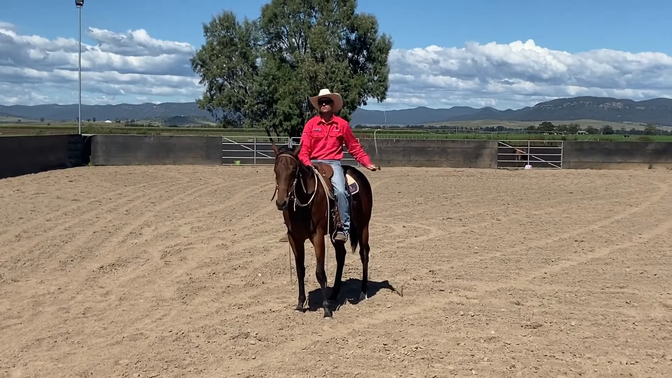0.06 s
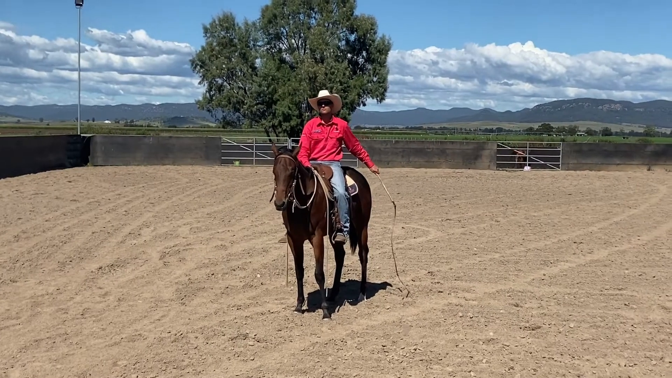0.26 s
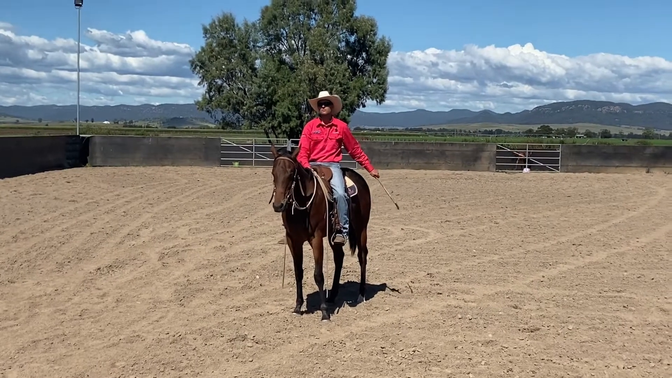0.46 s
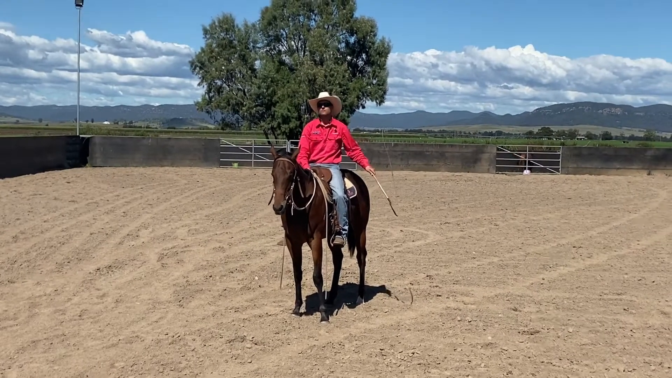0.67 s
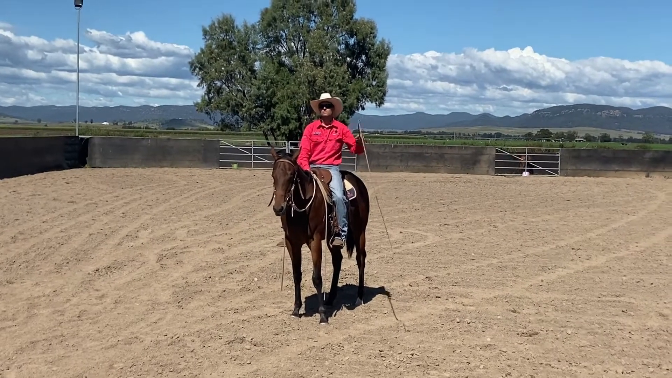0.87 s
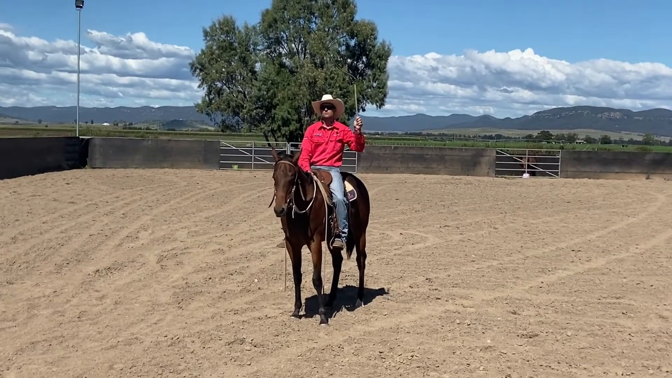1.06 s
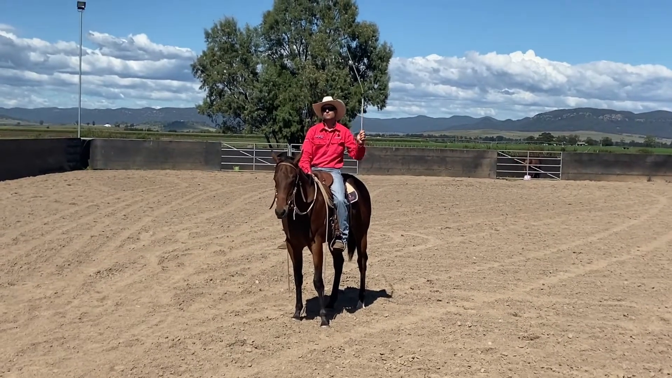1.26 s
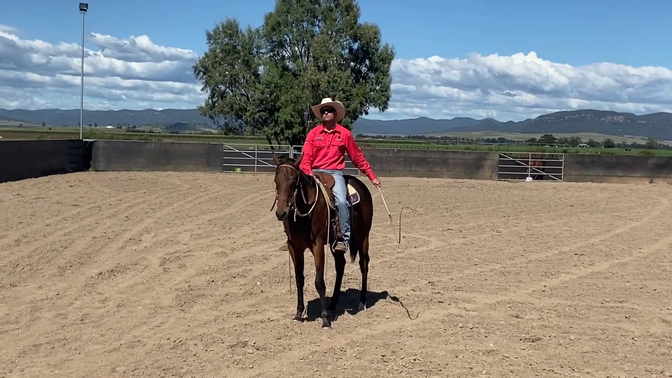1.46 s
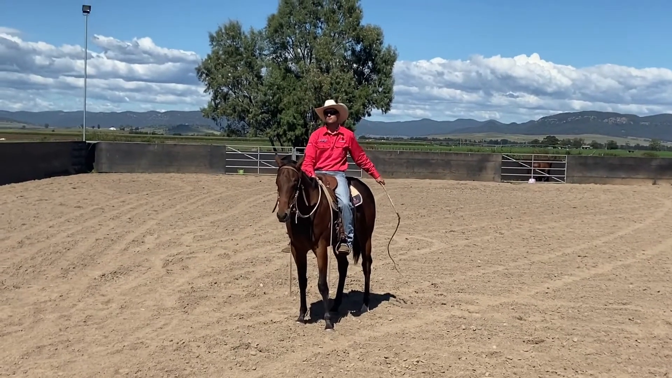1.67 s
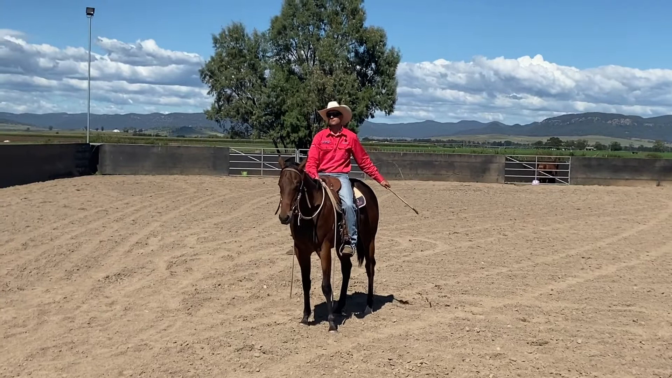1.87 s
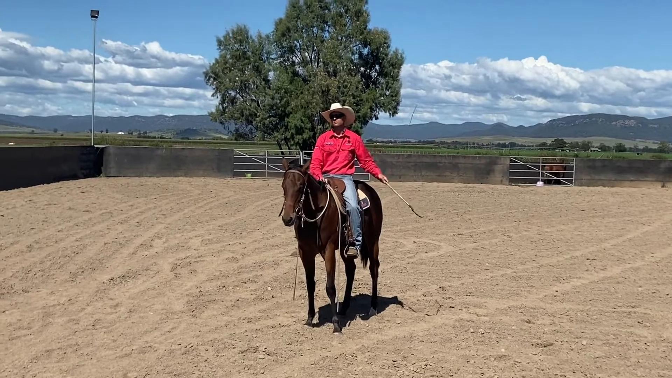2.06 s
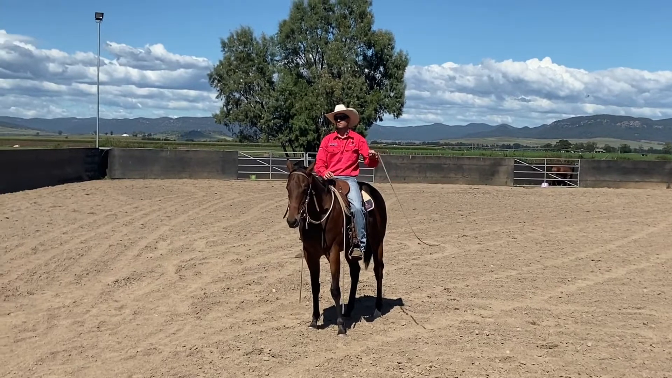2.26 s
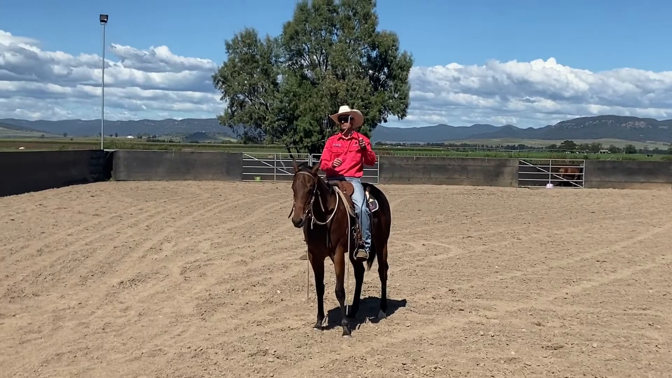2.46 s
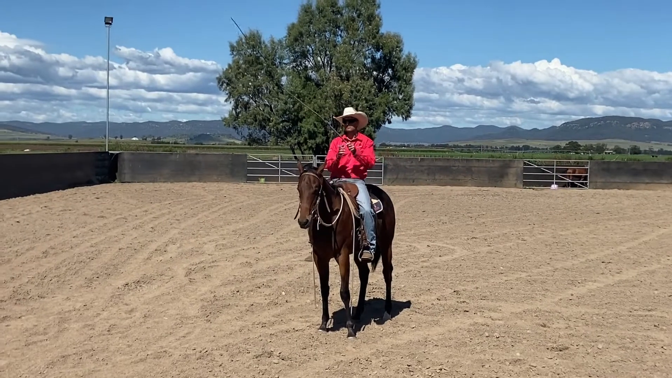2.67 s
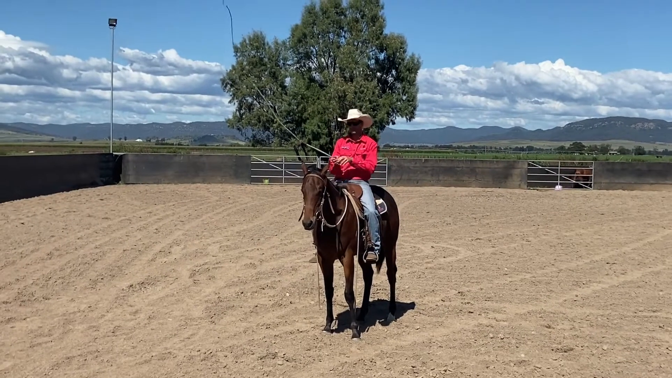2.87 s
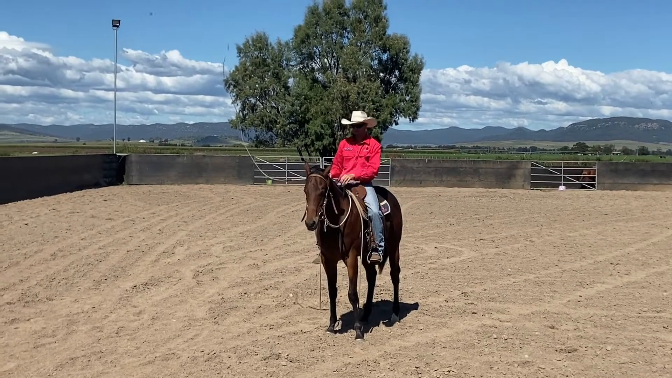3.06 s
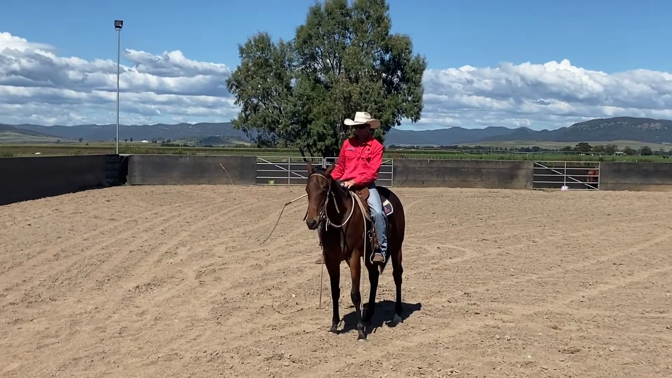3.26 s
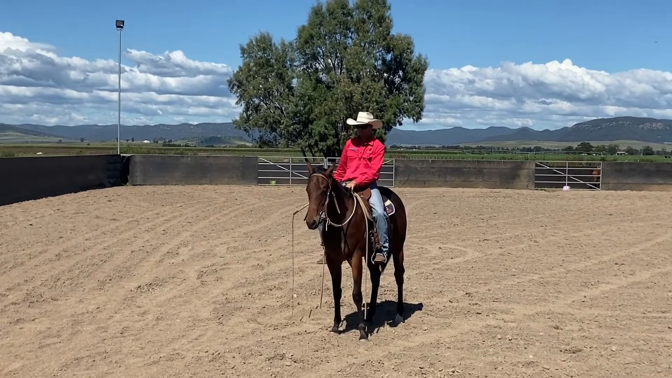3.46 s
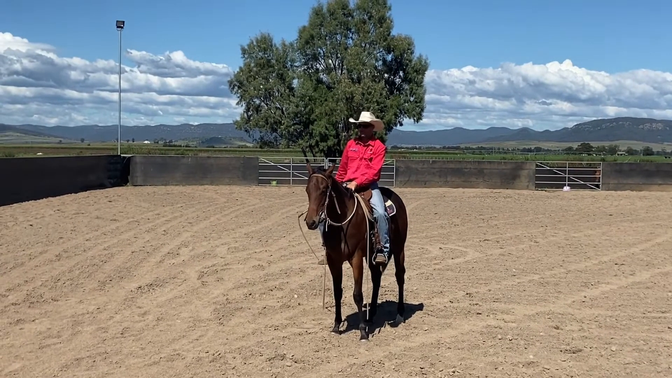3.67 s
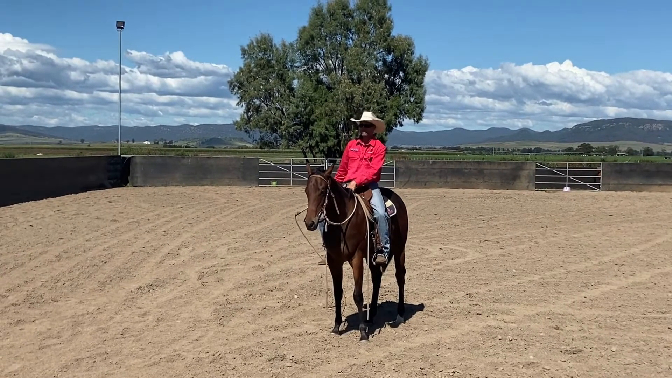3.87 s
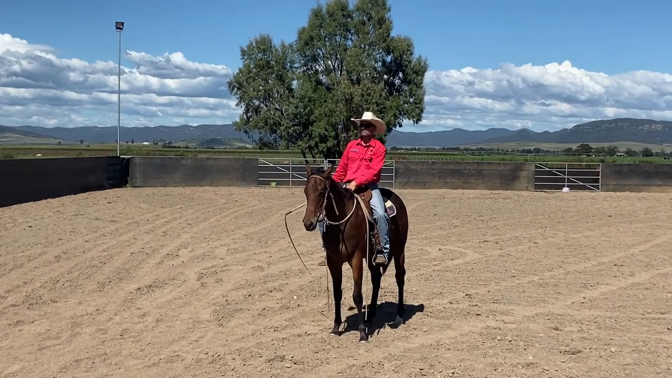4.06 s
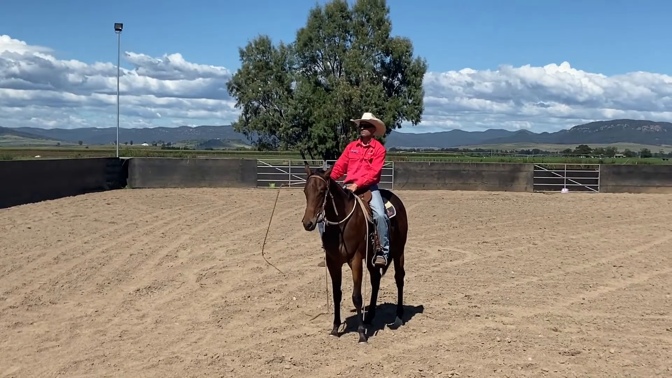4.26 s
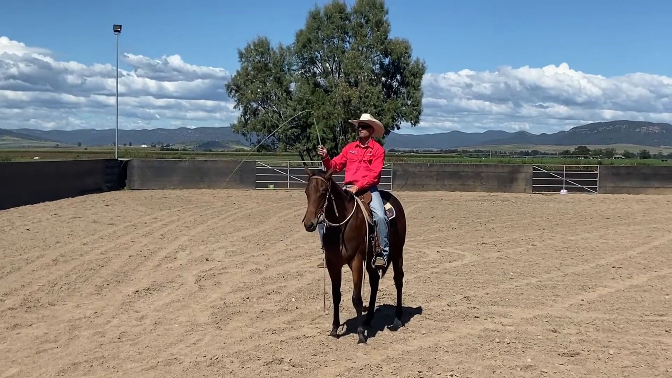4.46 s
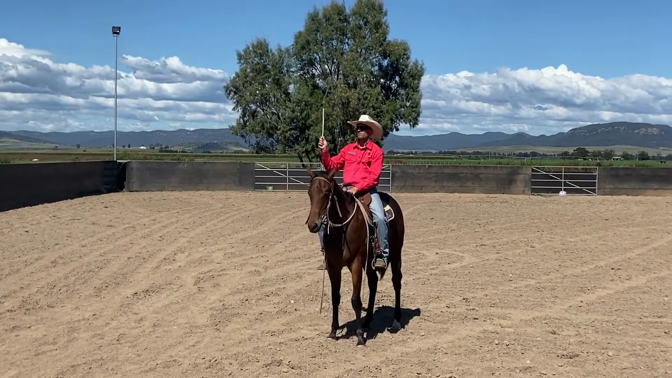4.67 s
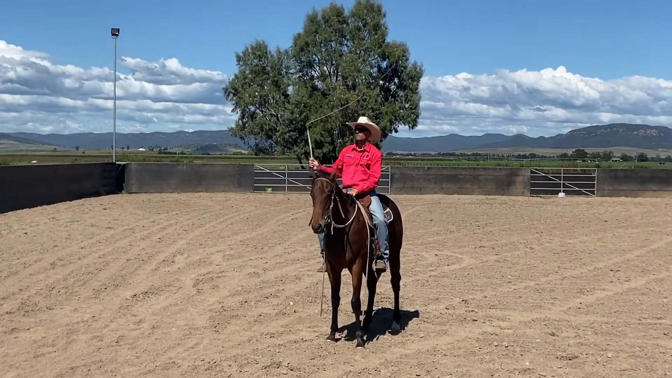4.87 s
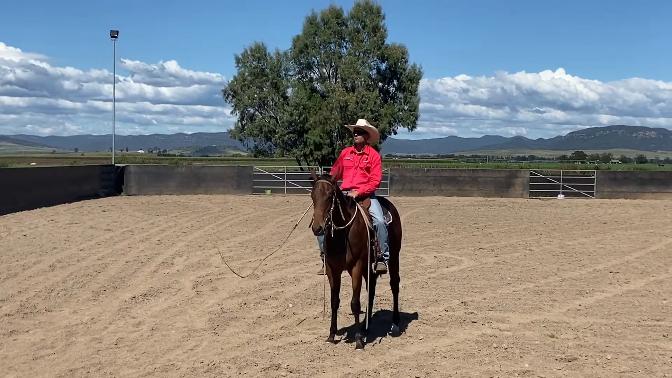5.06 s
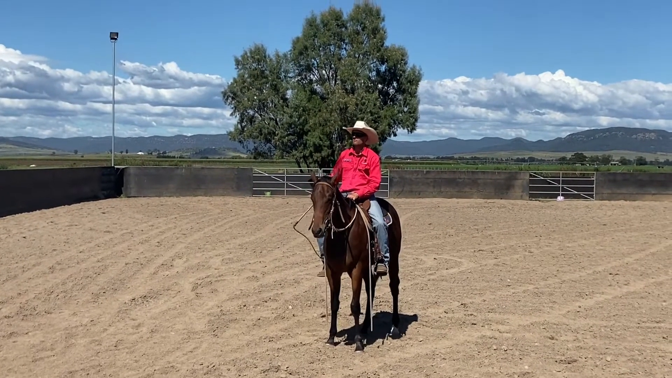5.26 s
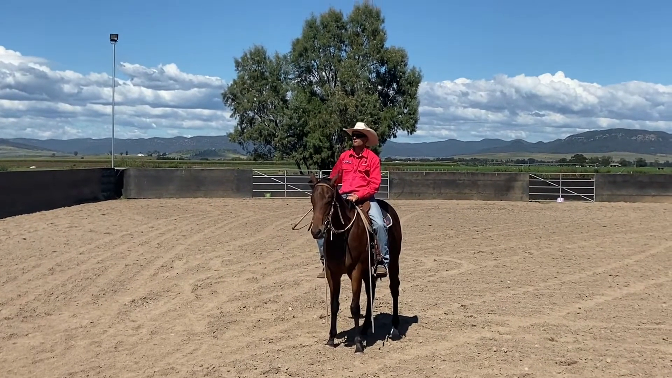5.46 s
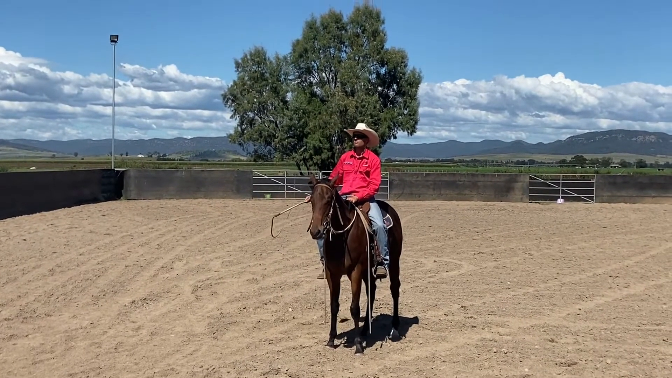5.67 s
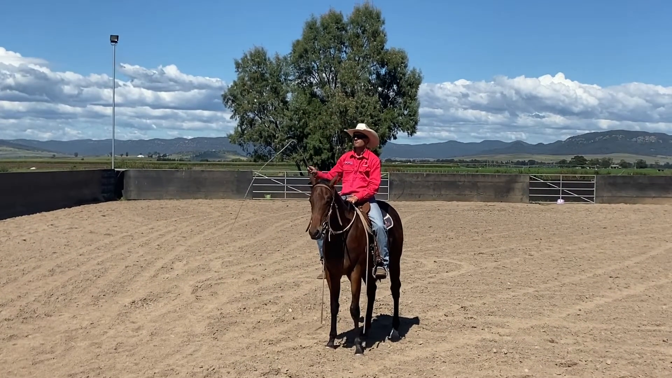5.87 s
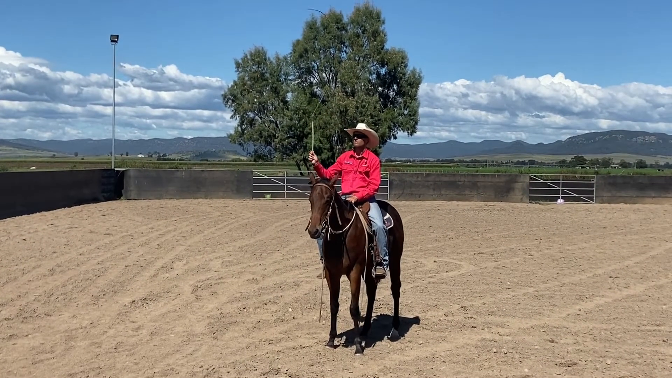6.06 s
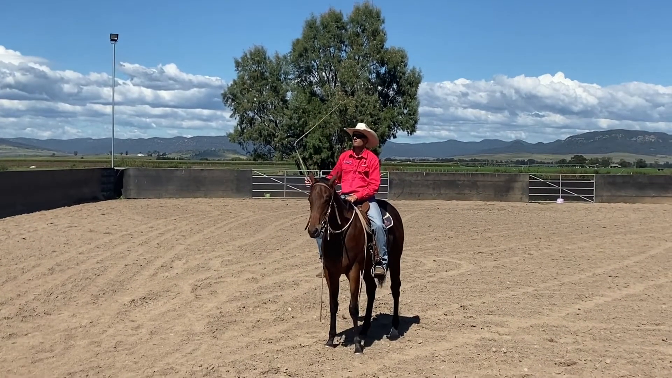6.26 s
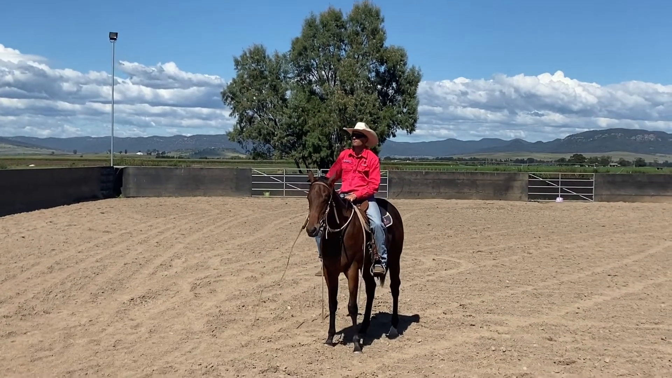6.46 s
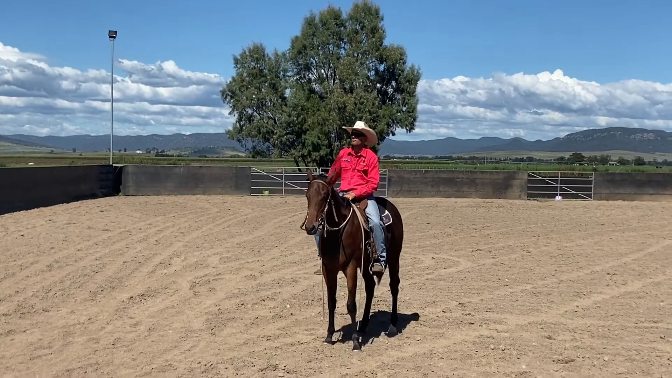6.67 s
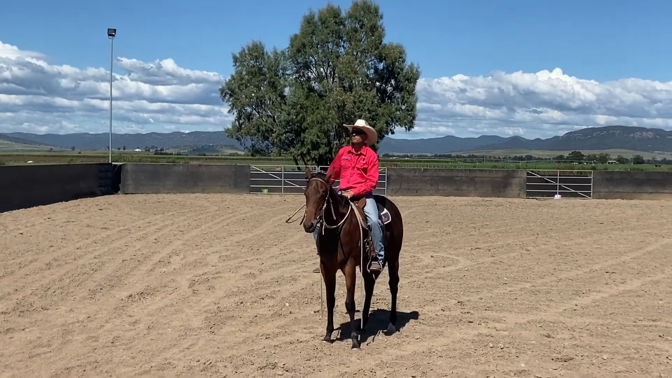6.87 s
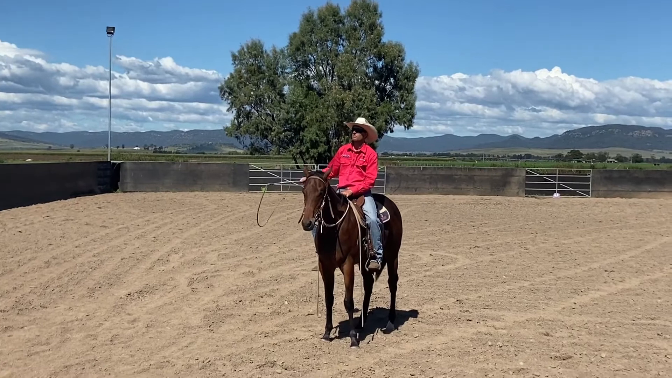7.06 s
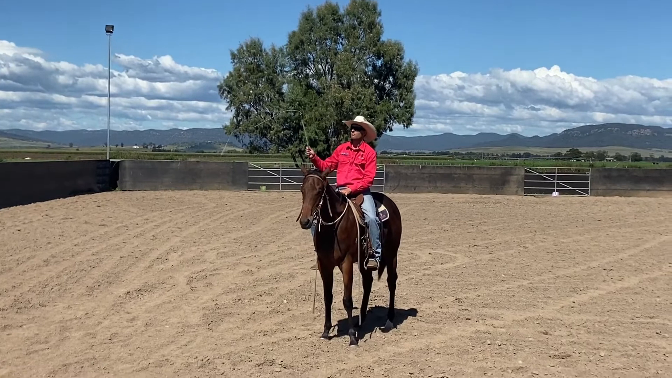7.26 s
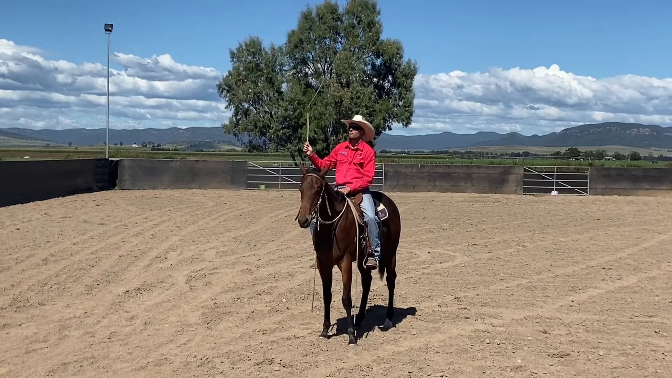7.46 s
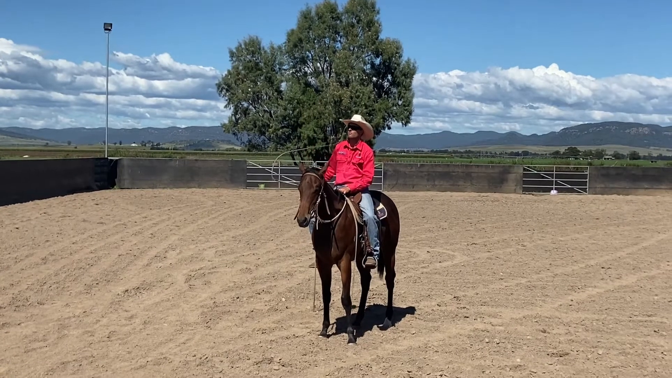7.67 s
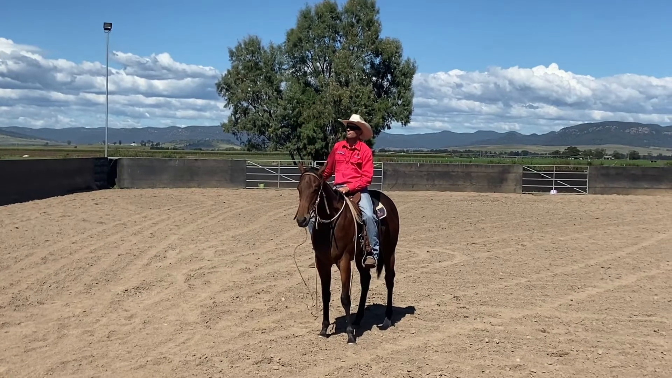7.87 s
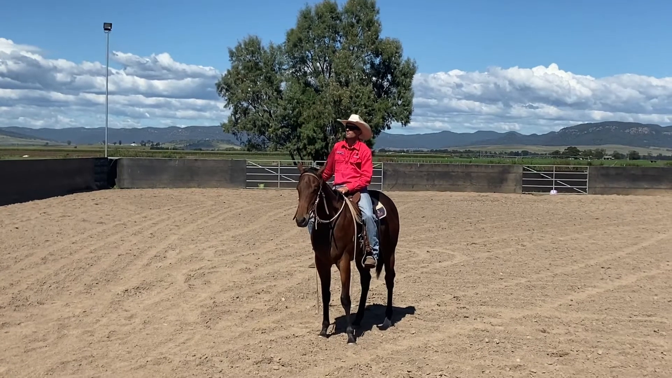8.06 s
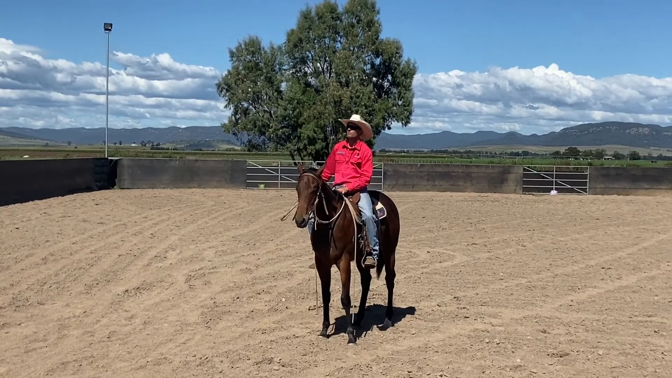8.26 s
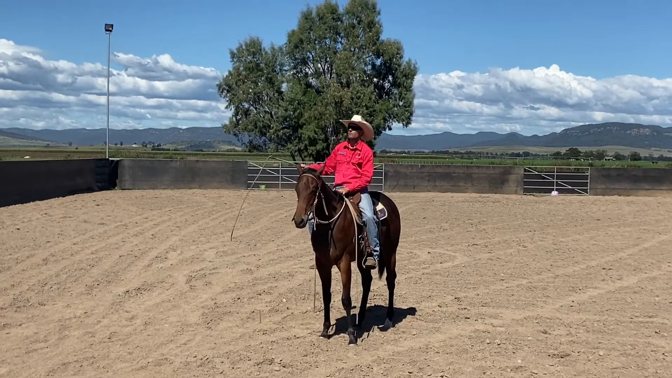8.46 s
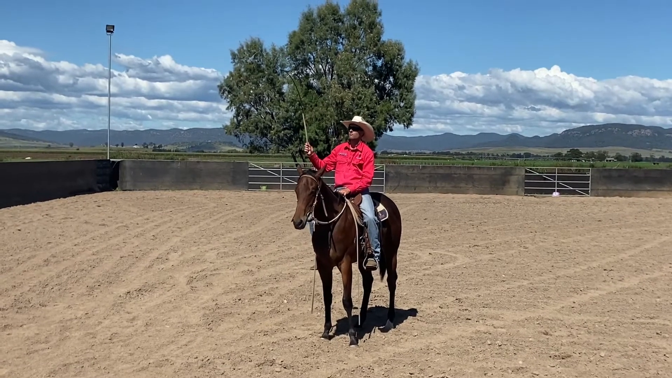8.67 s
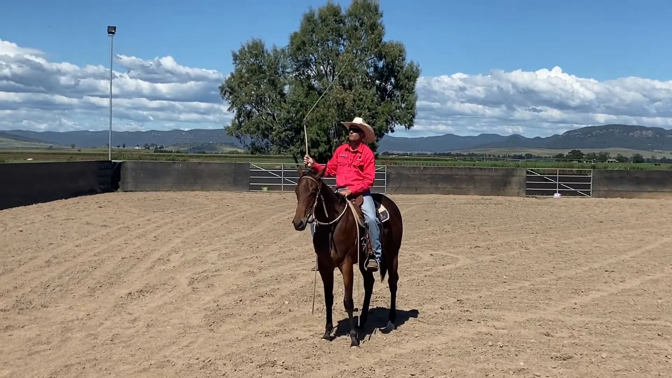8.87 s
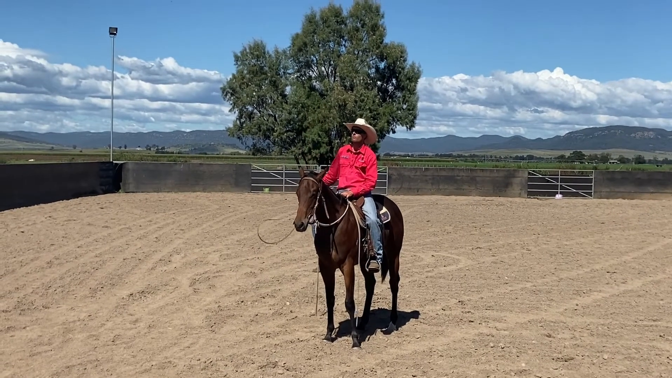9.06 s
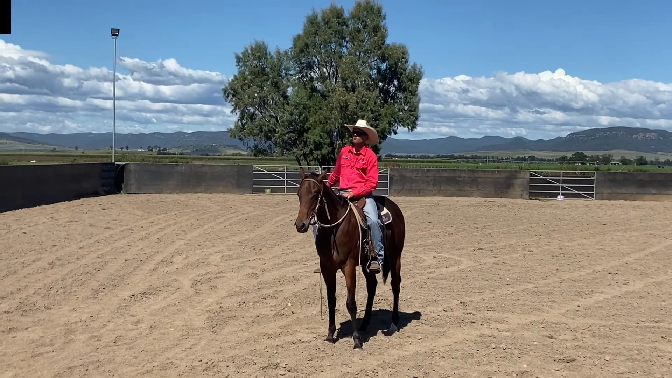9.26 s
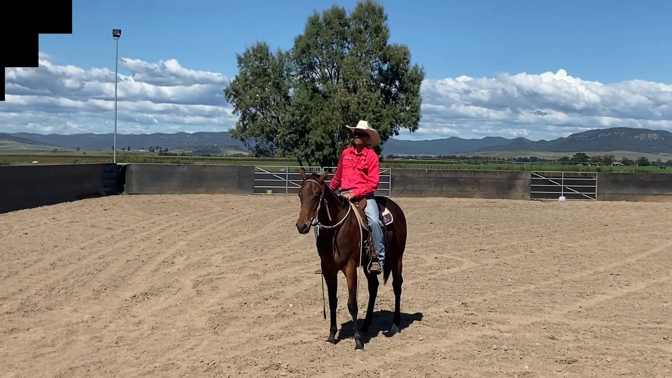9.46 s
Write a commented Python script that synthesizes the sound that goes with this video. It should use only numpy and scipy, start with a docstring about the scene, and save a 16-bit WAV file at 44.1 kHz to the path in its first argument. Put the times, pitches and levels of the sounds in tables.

```python
"""In an open sand arena, a rider on a standing horse cracks the string of a training stick six times.
Each crack is a tiny shock wave plus a low thump off the sand; walls throw it back and the yard rings on.
Bands of noise and wavering tones make the string's swishes; bursts of noise make gritty rustles and ticks.
Small birds twitter and whine in gliding tones, over filtered noise: a distant rumble, a breeze and a hiss."""
import sys
import numpy as np
from scipy import signal
from scipy.fft import rfft, irfft, next_fast_len
from scipy.io import wavfile

SR = 44100
rng = np.random.default_rng(int(sys.argv[2]) if len(sys.argv) > 2 else 0)


def transcribe(u):
    """Save the signal u as a 16-bit wav file named by the first command-line argument.

    u: samples, shape (n,) or (channels, n), limited to [-1, 1]; the rate is SR.
    q: integer samples, one column per channel.
    """
    v = np.clip(np.atleast_2d(u).T, -1, 1)
    q = np.round(v * 32767).astype(np.int16)
    wavfile.write(sys.argv[1], SR, q)


N = 418937
TIME = np.arange(N) / SR

# The six cracks and their echoes, all levels relative: [t/s, shock level/dB, shock length/ms,
# thump level/dB, boom level in the thump/dB, near wall delay/s, near wall level/dB, far walls level/dB,
# yard tail level/dB, gate delay/s, gate level/dB, wind-up level/dB, wind-up base f/Hz]
CRACKS = [(0.2205, 4.5, 0.04, -10, -1.5, 0.037, -34.5, -29.5, -40, 0.098, -26, -53.5, 759),
          (1.5497, -9.5, 0.039, -15, 6.5, 0.017, -21.5, -55, -50.5, 0.1, -23.5, -67, 850),
          (5.1289, -.5, 0.088, -10.5, 0, 0.032, -8, -28, -37, 0.16, -35, -81, 648),
          (6.5019, 1.5, 0.06, -9, -2.5, .0352, -9.5, -21, -34, 0.16, -22, -59, 688.5),
          (7.8458, -3, 0.27, -7.5, 0.5, .0347, -8.5, -25, -34, .1563, -26.5, -62, 644),
          (9.1723, 2.5, 0.081, -11, 1, 0.036, 1.5, -27.5, -31.5, 0.16, -15, -60.5, 670)]
# Tone of an echo off a rough surface: [f/Hz, level/dB]
ECHO_TONE = [(150, -22), (380, -18.5), (750, -4), (1400, -4), (2200, 3.5), (4000, -0.5), (7000, -1.5),
             (10000, -10), (16000, -16)]


def undb(db):
    """Turn decibels into a gain."""
    return 10 ** (np.asarray(db) / 20)


def unit(x):
    """Scale to an average (rms) strength of 1."""
    return x / np.sqrt(np.mean(x ** 2) + 1e-30)


def clock(length):
    """Sample times of a sound of this length in seconds."""
    return np.arange(int(length * SR)) / SR


def add(out, s, x):
    """Mix x into out from time s on."""
    i = max(int(round(s * SR)), 0)
    n = min(x.shape[-1], out.shape[-1] - i)
    if n > 0:
        out[..., i:i + n] += x[..., :n]


def at(points, hz, axis=1):
    """Read a table column at any frequency, evenly spaced by musical interval."""
    p = np.array(points, float)
    return np.interp(np.log(hz + 1e-9), np.log(p[:, 0]), p[:, axis])


def colour(x, points):
    """Give x the tone in a table, with a filter that never answers before the sound arrives."""
    size = 4096
    log_gain = np.log(undb(at(points, np.fft.rfftfreq(size, 1 / SR))))
    # folding the cepstrum forward in time makes the filter minimum-phase
    cepstrum = irfft(log_gain)
    cepstrum[1:size // 2] *= 2
    cepstrum[size // 2 + 1:] = 0
    response = irfft(np.exp(rfft(cepstrum)))
    return signal.oaconvolve(x, response)[:len(x)]


def band(x, lo, hi, order=2):
    """Keep mainly the frequencies between lo and hi."""
    sos = signal.butter(order, [lo, min(hi, SR / 2 - 100)], "band", fs=SR, output="sos")
    return signal.sosfilt(sos, x)


def noise(t):
    """White noise as long as t."""
    return rng.standard_normal(len(t))


def spread(x, side):
    """Make left and right: the side part is added on the left and subtracted on the right."""
    return x + np.array([[1], [-1]]) * side


def whip():
    """Each crack, its slap from the near wall and gate, the far walls' answer and the scattered tail."""
    # Reflections off horse and rider: [delay/s, level over the yard tail/dB]
    body_echoes = [(.0058, 21), (.0130, 18)]
    # Reflections off the far side of the arena: [delay/s, level/dB]
    far_walls = [(.289, 4), (.2932, 13), (0.3136, 6.5), (.3390, 1.5)]
    # Tones of the shock, of the thump and of the far walls: [f/Hz, level/dB]
    shock_tone = [(200, -8.5), (700, 1.5), (1300, -3), (2300, 3), (5000, 3), (7000, 1.5), (10000, -0.5),
                  (16000, -6)]
    ground_tone = [(40, -4), (100, 4), (180, 2.5), (290, -10.5), (430, 0), (540, -3), (680, 1), (860, -6),
                   (1150, -4.5), (1600, -4), (4000, 0)]
    far_tone = [(200, -58), (900, -24), (1400, -17.5), (2300, -1), (5000, -2.5), (7000, -6.5),
                (10000, -23.5), (16000, -41)]
    near_stretch = 0.95  # length of the clean shock from the wall's flat part, over the direct one
    lead = .02  # s, room ahead of each crack for the hiss that builds up to it

    direct, ground, near, far, tail, tail_side = np.zeros((6, N))
    yard, yard_side = yard_tail(far_share=0.29), yard_tail(far_share=0.085)
    for (s, shock_db, shock_ms, thump_db, boom_db, near_lag, near_db, far_db,
         tail_db, gate_lag, gate_db, *_) in CRACKS:
        add(direct, s - lead, undb(shock_db) * shock(shock_ms, lead))
        add(ground, s - lead, undb(thump_db) * thump(lead, boom_db))
        # near wall: rough scatter, a clean shock and a thump
        add(near, s + near_lag - .0004, undb(near_db + 2.5) * burst(decay=0.00041))
        add(direct, s + near_lag - lead, undb(near_db - 5) * shock(near_stretch * shock_ms, lead))
        add(ground, s + near_lag - lead, undb(near_db - 22) * thump(lead, boom_db))
        # gate
        add(near, s + gate_lag, undb(gate_db) * burst(decay=0.001))
        add(ground, s + gate_lag + 0.0018 - lead, undb(gate_db - 19) * thump(lead, boom_db=-17.5))
        for lag, db in body_echoes:
            add(near, s + lag - .0004, undb(tail_db + db) * burst(decay=0.00082))
        for lag, db in far_walls:
            add(far, s + lag, undb(far_db + db) * soften(burst(decay=0.0014), shock_ms))
        add(tail, s, undb(tail_db) * soften(yard, shock_ms))
        aim = 1 + .07 * rng.standard_normal()  # each crack meets the ribs at its own angle
        add(tail, s + .07, undb(tail_db) * ribs(db=-14, start_hz=2700 * aim, end_hz=1990 * aim))
        add(tail, s + .1, undb(tail_db) * ribs(db=-20.5, start_hz=3600 * aim, end_hz=2900 * aim))
        add(tail_side, s, undb(tail_db) * yard_side)

    slaps = colour(direct, shock_tone) + colour(ground, ground_tone)
    echoes = colour(near, ECHO_TONE) + colour(far, far_tone)
    # sound from the sides differs between left and right mostly near 1 kHz
    around = np.roll(0.12 * slaps + 0.27 * echoes, 30) + 2.0 * tail_side
    side = band(around, 850, 1600) + 0.8 * band(around, 180, 650) + 0.056 * around
    return spread(slaps + echoes + tail, side)


def shock(length_ms, lead):
    """The tip hisses as it speeds up, goes supersonic and sheds one steep pressure swing."""
    t = clock(.04) - lead
    swing = -np.tanh(t * SR * 2) * np.exp(-np.abs(t) * 1000 / length_ms)
    before = 0.27 * np.exp(-np.abs(t + 0.00049) / 0.00034)
    after = 0.066 * np.exp(-np.abs(t - .0007) / .0028)
    lowest_hz = 2500 * (.04 / length_ms) ** 0.38  # a faster tip hisses higher
    return swing + (before + after) * band(noise(t), lowest_hz, 12000)


def thump(lead, boom_db):
    """Sand returns a dull inverted shock; porous ground slows the low notes, so they glide down."""
    t = clock(0.11) - lead
    gust_shape = 0.8 * np.exp(-np.abs(t) / np.where(t < 0, .003, 0.0045))
    gust = band(noise(t), 350, 1500) * gust_shape
    v = (t - .0014) / 0.00027
    bounce = -.7 * (1 - v ** 2) * np.exp(-v ** 2 / 2)
    age, glide = np.maximum(t, 0), .0022  # s
    turns = 830 * glide * np.log1p(age / glide)  # starts at 830 Hz and sinks
    knock = .6 * np.exp(-age / .002)
    boom = 0.26 * undb(boom_db) * np.exp(-age / 0.0098)
    fade = (1 - np.exp(-age / .0005)) * (knock + boom)
    return gust + bounce - fade * np.cos(2 * np.pi * turns)


def burst(decay):
    """A reflection off a rough surface: a dense cluster of tiny clicks with a fixed total energy."""
    t = clock(0.014)
    x = noise(t) * (1 - np.exp(-t / decay)) ** 2 * np.exp(-t / decay)
    return 2.6 * x / np.sqrt(np.sum(x ** 2))


def soften(x, shock_ms):
    """A longer shock carries less treble into its echoes."""
    pole = np.exp(-1000 / (SR * .22 * shock_ms))
    return signal.lfilter([1 - pole], [1, -pole], x)


def yard_tail(far_share):
    """Grainy scatter from sand, rails and trees, each octave with its own fade; far walls swell it again."""
    # Tone and fade of the tail: [f/Hz, level/dB, time to fade by 60 dB/s]
    tail_tone = [(150, 0, 0.47), (382, -9.5, 0.28), (1000, -4, 0.71), (1483.5, -5.5, 1.6), (2270, 1, 0.62),
                 (4430, -2.5, 1.1), (6340, -5.5, .8), (10100, -14, 0.82), (16000, -23, 0.84)]
    patch_db = 1.33  # unevenness within each octave
    t, out = np.arange(SR) / SR, 0
    late = np.maximum(t - .29, 0)  # s since the far walls answered
    f = np.fft.rfftfreq(SR, 1 / SR)
    grains = undb(3.7 * np.repeat(rng.standard_normal(SR), 32)[:SR])
    scatter = rfft(unit(noise(t) * grains))
    early = 1 - np.exp(-t / 0.00062)
    swell = far_share * (1 - np.exp(-late / 0.018))
    for hz in 125 * 2 ** np.arange(8):
        octave = np.clip(1 - np.abs(np.log2((f + 1) / hz)), 0, 1)
        rate = np.log(1000) / at(tail_tone, hz, axis=2)
        first_fade = early * (np.exp(-rate * t) + 2.4 * np.exp(-t / 0.019))
        far_fade = swell * np.exp(-1.4 * rate * late)
        patches = undb(patch_db * unit(band(noise(t), 15, 90)))  # single posts and trunks stand out
        out = out + (first_fade + far_fade) * patches * irfft(scatter * octave, SR)
    return colour(out, tail_tone)


def ribs(db, start_hz, end_hz):
    """Evenly spaced ribs of a wall return a train of pulses that slows down: a faint falling zing."""
    t = clock(0.14)
    wander = 1 + .07 * unit(band(noise(t), 40, 400))
    hz = (end_hz + (start_hz - end_hz) * np.exp(-t / 0.06)) * wander
    phase = 2 * np.pi * np.cumsum(hz) / SR
    uneven = undb(3.2 * unit(band(noise(t), 25, 200)))
    fade = np.sin(np.pi * t / t[-1]) * np.exp(-t / 0.12)
    return undb(db) * uneven * fade * (np.sin(phase) + .5 * np.sin(2 * phase))


def swishes():
    """The string sheds whirls of air in wind-up, swing and lash; also a few hollow knocks and whooshes."""
    # Short hollow knocks and brief whooshes: [t/s, level/dB, base f/Hz, rise and fall time/s]
    short_puffs = [(0.546, -32, 525, .004), (0.56, -20, 640, 0.0033), (2.362, -50, 888, .024),
                   (3.197, -55.5, 568, .014), (3.32, -57.5, 608, .027)]
    # lead: time of the peak ahead of the crack, s; rise and fall in s; base pitch in Hz
    windup_lead, windup_rise, windup_fall = .157, 0.022, 0.028
    swing_lead, swing_hz, swing_rise, swing_fall = 0.053, 600, .045, 0.051
    swing_re_windup_db = -4
    lash_lead, lash_hz, lash_rise, lash_fall, lash_db = .004, 608, 0.022, .004, -47.5

    out = np.zeros(N + SR)  # one spare second in front, so that early swishes can start
    puffs = [(s, db, hz, half, half) for s, db, hz, half in short_puffs]
    for s, *_, windup_db, windup_hz in CRACKS:
        swing_db = windup_db + swing_re_windup_db
        puffs += [(s - windup_lead, windup_db, windup_hz, windup_rise, windup_fall),
                  (s - swing_lead, swing_db, swing_hz, swing_rise, swing_fall),
                  (s - lash_lead, lash_db, lash_hz, lash_rise, lash_fall)]
    for s, db, hz, rise, fall in puffs:
        add(out, 1 + s - 3 * rise, undb(db) * rush(hz, rise, fall))
    return out[SR:]


def rush(hz, rise, fall):
    """Air swells and fades, its pitch following the speed; short is a cleaner tone, long is turbulent."""
    t = clock(3 * (rise + fall)) - 3 * rise
    speed = np.exp(-(t / np.where(t < 0, rise, fall)) ** 2)
    phase = 2 * np.pi * np.cumsum(hz * (.73 + 0.24 * speed)) / SR
    turbulence = min((rise + fall) / .04, .85)
    sine_part = band(noise(t), 10, 90, order=1) * np.sin(phase)
    cosine_part = band(noise(t), 10, 90, order=1) * np.cos(phase)
    eddies = band(unit(sine_part + cosine_part), 300, 1100)
    return speed * (np.sqrt(1 - turbulence ** 2) * np.sin(phase) + 0.68 * turbulence * eddies)


def scuffs():
    """Gritty noise in little clumps: short rustles in the sand, and the rough part of knocks near 0.55 s."""
    # Short gritty rustles in the sand, and the rough noise of the knocks near 0.55 s:
    # [t/s, level/dB, fade time/s]
    scuff_list = [(0.025, -51.5, 0.0043), (0.508, -46, 0.0067), (.555, -37.5, 0.0017),
                  (0.903, -54.5, 0.025), (2.33, -63, 0.047), (3.283, -62.5, 0.013), (3.316, -67.5, 0.045),
                  (3.773, -64, 0.014), (3.855, -66.5, 0.01), (5.874, -60, 0.046), (6.213, -61, 0.046),
                  (7.217, -57, 0.041), (8.542, -57.5, 0.056)]
    # Tone of the sand: [f/Hz, level/dB]
    sand_tone = [(200, -25), (500, -7.5), (850, 0.5), (1400, -8.5), (2500, -12), (6000, -22.5),
                 (10000, -27.5), (16000, -37)]
    out = np.zeros(N)
    for s, db, length in scuff_list:
        t = clock(6 * length)
        clumps = np.repeat(noise(t), 40)[:len(t)]
        grit = unit(colour(noise(t) * undb(2.5 * clumps), sand_tone))
        fade = 2 * (1 - np.exp(-3 * t / length)) * np.exp(-t / length)
        add(out, s, undb(db) * grit * fade)
    return out


def ticks():
    """Small ticks of the string and a few click-like echoes: a noisy click and two very short tones."""
    # Small ticks of the string, and a few click-like echoes of the cracks, levels relative:
    # [t/s, click level/dB, ring level/dB, f between the two tones/Hz]
    tick_list = [(0.022, -38.5, -60.5, 2570), (0.387, -33, -48.5, 2280), (0.532, -22, -41.5, 3710),
                 (.8, -49.5, -61, 4810), (1.202, -34, -39, 2900), (1.226, -30.5, -35, 2510),
                 (1.568, -21.5, -60, 5000), (1.592, -25, -40, 2400), (1.716, -42, -51.5, 2500),
                 (1.89, -60.5, -56.5, 2500), (2.755, -54, -69, 2630), (3.461, -42, -68, 4160)]
    out, t = np.zeros(N), clock(.03)
    fade = (1 - np.exp(-t / .0003)) * np.exp(-t / .0012)
    for s, click_db, ring_db, hz in tick_list:
        ring = np.sin(2 * np.pi * 0.85 * hz * t) + .8 * np.sin(2 * np.pi * 1.2 * hz * t)
        add(out, s, undb(ring_db + 6) * fade * ring)
        add(out, s, undb(click_db) * colour(burst(decay=0.0014), ECHO_TONE))
    return out


def wren():
    """A wren's quick upward calls, runs of song notes slurred up or down, and plain whistles."""
    # Upward calls: [t/s, middle f/Hz, level/dB]
    upward_calls = [(1.102, 5600, -68), (2.145, 5450, -71), (2.903, 5170, -63), (3.528, 5410, -60.5),
                    (3.889, 6220, -67.5), (4.055, 5600, -66.5), (4.39, 5600, -70), (4.695, 5320, -62),
                    (4.84, 5220, -58.5), (5.79, 5260, -63), (6.14, 5130, -59.5), (7.437, 5480, -58.5),
                    (8.392, 5340, -62.5), (9.09, 5170, -64)]
    # Longer plain whistles: [t/s, length/s, start f/Hz, end f/Hz, level/dB]
    whistles = [(2.559, .1, 5700, 3250, -75.5), (7.05, 0.12, 5290, 5480, -74),
                (7.256, 0.061, 5400, 5050, -68.5), (7.46, .3, 4980, 4770, -76)]
    # Runs of song: [start t/s, end t/s, notes per second, centre f/Hz, scatter of f/Hz, level/dB]
    song = [(2.281, 2.75, 11, 6750, 300, -76.5), (2.779, 3.7, 17, 6440, 520, -69),
            (3.951, 4.9, 6, 7100, 350, -77.5), (4.92, 6.45, 36, 7014, 300, -71.5),
            (5.55, 6.4, 13, 5610, 420, -69.5)]
    call_s, call_sweep_hz = .022, 1900
    # slur: largest glide each way, in units of the pitch scatter
    note_s, note_slur, note_scatter_db, note_jitter_s = .028, 1.2, 3.5, .02

    out = np.zeros(N)
    for s, hz, db in upward_calls:
        add(out, s, undb(db) * note(call_s, hz - call_sweep_hz / 2, hz + call_sweep_hz / 2))
    for s, length, start_hz, end_hz, db in whistles:
        add(out, s, undb(db) * note(length, start_hz, end_hz))
    for start, end, rate, centre_hz, scatter_hz, db in song:
        for s in np.arange(start, end, 1 / rate):
            late, high, slur, loud = rng.standard_normal(4)
            hz = centre_hz + scatter_hz * high
            glide = note_slur * scatter_hz * np.tanh(2 * slur)
            gain = undb(db + note_scatter_db * loud)
            add(out, s + note_jitter_s * late, gain * note(note_s, hz - glide, hz + glide))
    return out * undb(6.3 * unit(band(noise(TIME), 53, 220)) - 2)  # the tiny throat flutters


def note(length, start_hz, end_hz):
    """One gliding, slightly wavering bird note."""
    u = clock(length) / length
    waver = 1 + .015 * unit(band(noise(u), 80, 600))
    hz = (start_hz + (end_hz - start_hz) * u) * waver
    return np.sqrt(np.sin(np.pi * u)) * np.sin(2 * np.pi * np.cumsum(hz) / SR)


def finch():
    """Thin nasal whines, like a finch's: a gliding stack of harmonics through one throat resonance."""
    # Whines: [t/s, length/s, start f/Hz, end f/Hz, brightest f/Hz, level/dB]
    whines = [(3.51, 0.21, 627, 559, 4470, -74), (3.827, 0.28, 586, 555, 4100, -74),
              (3.913, 0.23, 556, 521, 3410, -71.5), (4.159, .22, 593, 558, 4130, -76),
              (4.49, 0.17, 575, 592, 3900, -77.5)]
    throat_hz = 650  # half width of the resonance
    out = np.zeros(N)
    for s, length, start, end, bright_hz, db in whines:
        u = clock(length) / length
        waver = 1 + .009 * unit(band(noise(u), 80, 600))
        phase = 2 * np.pi * np.cumsum((start + (end - start) * u ** 2) * waver) / SR
        call = sum(np.sin(k * phase) / (1 + ((k * start - bright_hz) / throat_hz) ** 2)
                   for k in range(4, 12))
        add(out, s, undb(db) * unit(call) * np.sin(np.pi * u) ** .5)
    return out


def outdoors(x, wet_db, t60):
    """Add the thin scatter of trees and fences: noise that fades by 60 dB in t60 seconds."""
    t = clock(.5)
    response = noise(t) * undb(-60 * t / t60) * (1 - np.exp(-t / 0.0054))
    response = response / np.sqrt(np.sum(response ** 2))
    wet = undb(wet_db) * signal.oaconvolve(x, response)[:N]
    return spread(x + wet, .2 * wet)


def air():
    """Far rumble and light breeze, swelling slowly as listed with a random flutter, over a steady hiss."""
    # Tones of the three noises: [f/Hz, level/dB]
    rumble_tone = [(20, -20.5), (35, -9), (52, 5), (75, 1.5), (110, -6.5), (160, -15), (260, -25.5),
                   (500, -56.5)]
    breeze_tone = [(100, -6.5), (250, 2), (500, -3), (900, -11.5), (1400, -19), (2200, -22), (4000, -23),
                   (7000, -29.5), (9000, -39.5), (16000, -55.5)]
    hiss_tone = [(200, 1.5), (1000, -2.5), (2200, -3), (4000, -8.5), (7000, -11.5), (9000, -18.5),
                 (12000, -22.5), (16000, -42)]
    # Slow swells, before a small fixed lift and the flutter: [t/s, level/dB]
    rumble_swell = [(0.0, -56.5), (1.11, -62), (1.74, -55.5), (1.93, -61.5), (2.41, -61.5), (3.01, -63),
                    (3.33, -69.5), (4.02, -57.5), (4.79, -61.5), (4.97, -56.5), (5.66, -56.5),
                    (5.82, -61.5), (7.28, -55.5), (8.68, -57), (9.15, -53.5), (9.5, -54.5)]
    breeze_swell = [(0.0, -65), (0.42, -62.5), (0.71, -72), (1.77, -75.5), (2.12, -77), (3.07, -71),
                    (3.63, -69), (3.78, -64.5), (4.1, -66.5), (4.47, -73), (5.34, -71.5), (6.0, -78.5),
                    (6.51, -69), (6.93, -76.5), (7.8, -64), (8.12, -78), (9.26, -73), (9.5, -76)]
    rumble_flutter_db, breeze_flutter_db = 1.6, 0.78

    rumble_db = np.interp(TIME, *np.transpose(rumble_swell))
    breeze_db = np.interp(TIME, *np.transpose(breeze_swell))
    knots = np.arange(0, 10, 1 / 9)  # a new random level nine times a second
    flutter = np.interp(TIME, knots, noise(knots))
    rumble = unit(colour(noise(TIME), rumble_tone))
    breeze = unit(colour(noise(TIME), breeze_tone))
    hiss = unit(colour(noise(TIME), hiss_tone))
    # each noise played backwards serves as its own unrelated side signal
    return (spread(rumble, 0.12 * rumble[::-1]) * undb(rumble_db + 3.0 + rumble_flutter_db * flutter)
            + spread(breeze, .3 * breeze[::-1]) * undb(breeze_db + 1.44 + breeze_flutter_db * flutter)
            + spread(hiss, .2 * hiss[::-1]) * undb(-85.0))


def scene():
    """Everything in the arena; the low swishes stay dry, the trees scatter the brighter sounds."""
    small = spread(swishes(), 0) + outdoors(scuffs() + ticks(), wet_db=-24, t60=.7)
    birds = outdoors(wren() + finch(), wet_db=-3.0, t60=0.47)
    return whip() + small + birds + air()


def record(dry):
    """Left and right differ in phase: slightly in lows and mids, strongly in the high treble.

    The highest peaks are rounded and the top is cut."""
    # Phase by which the left leads the right: [f/Hz, phase/radians]
    left_lead = [(0, 0), (120, 0), (300, .2), (550, 0), (1050, .5), (1300, 0), (1650, .7), (1950, .1),
                 (3000, .3), (5000, .1), (5800, -.4), (6600, 0), (7400, -.35), (9050, -3.14), (11200, -6.2),
                 (13250, -9.4), (15300, -12.5)]
    top_hz = 16600
    size = next_fast_len(N + 4096)
    lead = np.interp(np.fft.rfftfreq(size, 1 / SR), *np.transpose(left_lead))
    turn = np.exp(.5j * lead * np.array([[1], [-1]]))  # half the lead to each side
    shifted = irfft(rfft(dry, size) * turn, size)[:, :N]
    rounded = shifted / (1 + (shifted / .8) ** 8) ** (1 / 8)
    return signal.sosfilt(signal.ellip(8, .2, 70, top_hz, fs=SR, output="sos"), rounded)


dry = scene()
out = record(dry)
transcribe(out)
```